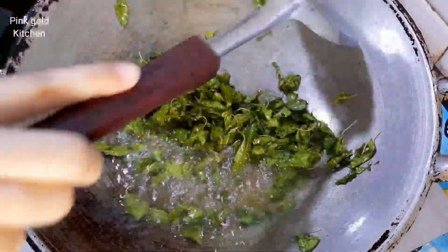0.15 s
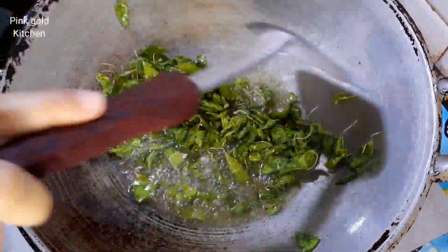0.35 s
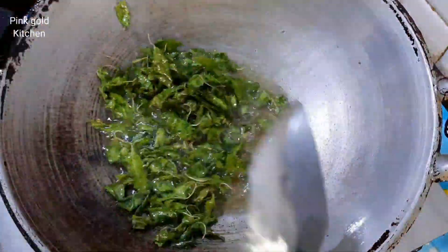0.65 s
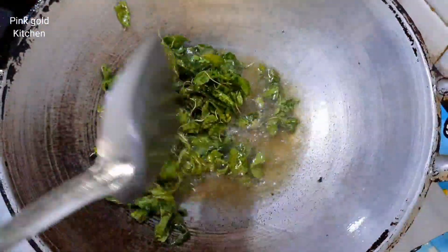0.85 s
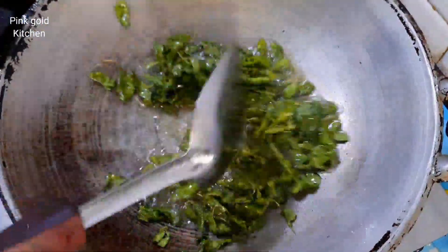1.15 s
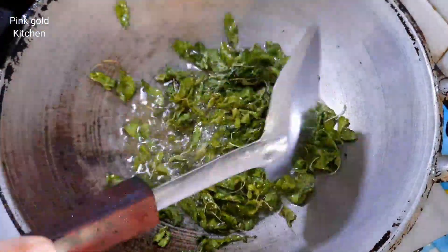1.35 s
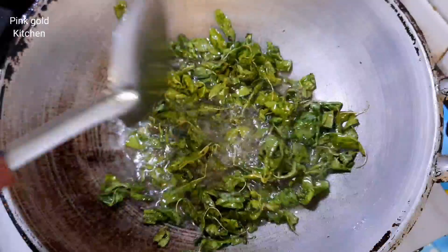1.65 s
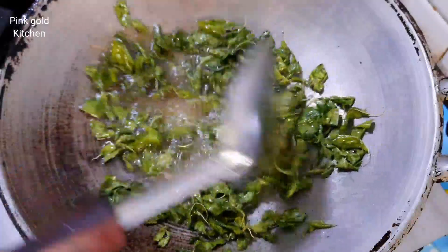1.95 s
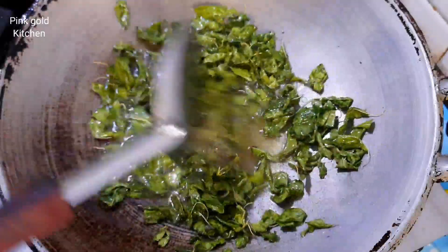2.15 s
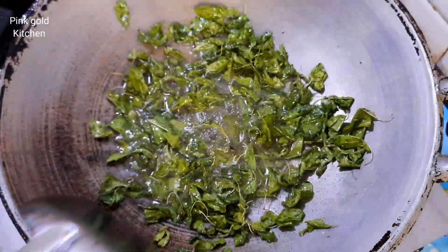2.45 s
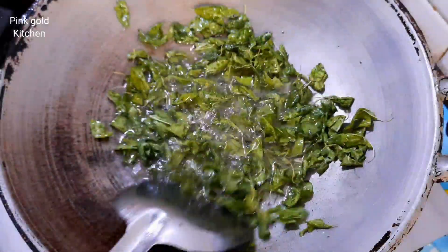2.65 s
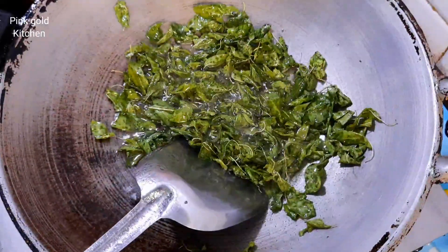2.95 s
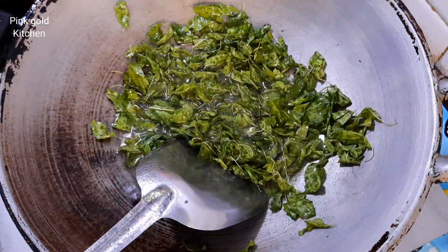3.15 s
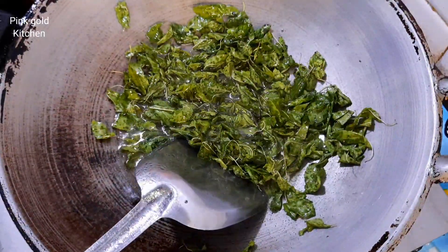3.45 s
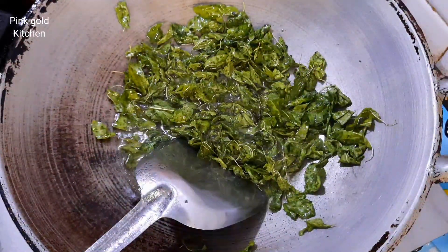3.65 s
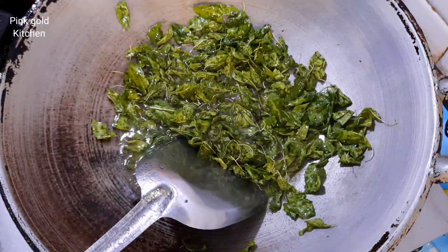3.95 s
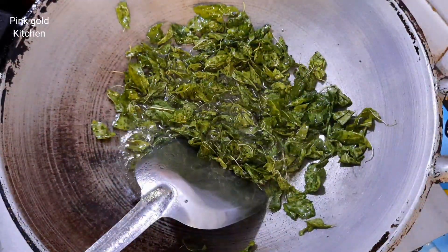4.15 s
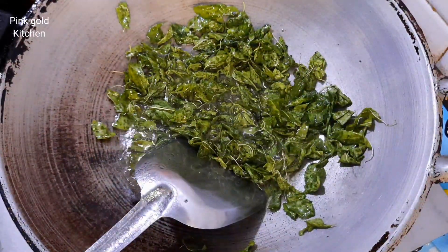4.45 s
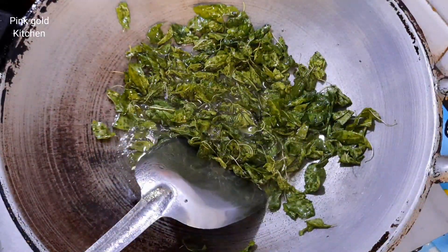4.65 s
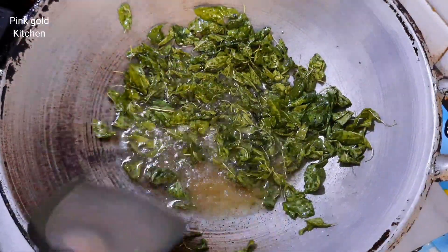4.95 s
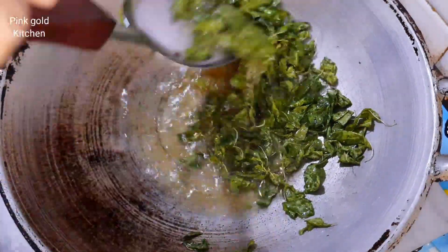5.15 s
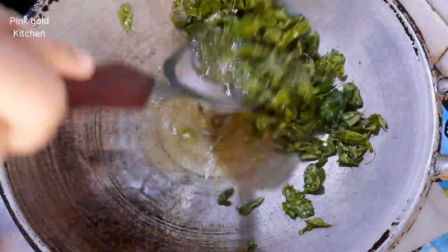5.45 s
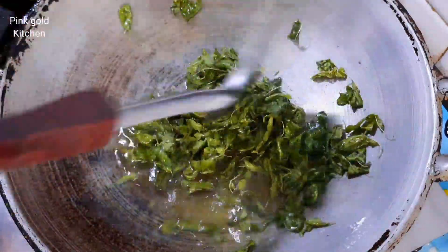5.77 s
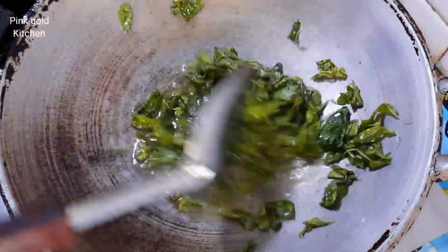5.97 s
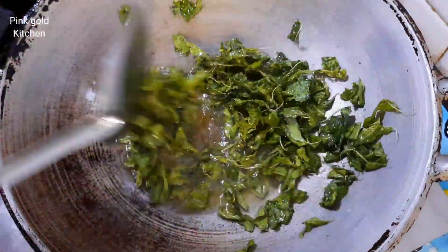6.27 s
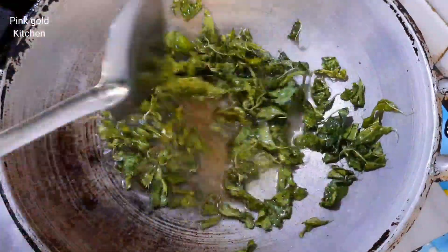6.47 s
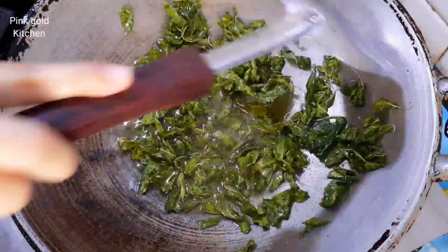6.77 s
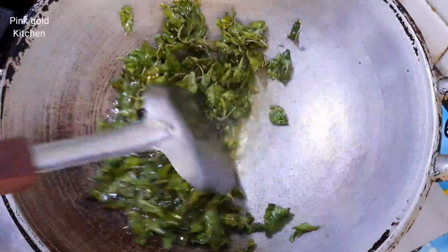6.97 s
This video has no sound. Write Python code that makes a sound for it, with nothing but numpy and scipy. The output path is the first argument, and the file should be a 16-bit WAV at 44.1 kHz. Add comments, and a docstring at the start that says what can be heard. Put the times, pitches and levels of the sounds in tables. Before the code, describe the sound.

Leaves fry in hot oil with a dense bright sizzle, bubbling plops and sharp spits, while a metal spatula knocks and scrapes the wok.

```python
"""A small kitchen: close by, leaves fry in a pool of hot oil in a wok over a gas flame.
Steam bubbles plop as short rising rings; swarms of tiny noise bursts sizzle and fizz; droplets spit and leaves tick.
A metal spatula pushes the leaves, which squelch and then fizz; it rests in the middle, then stirs again.
Its knocks ring the wok as decaying modes, its scrapes are rough noise, its squeals and drags fuzzy gliding tones.
The gas flame is a soft roar of low noise; a short room tail follows everything in the wok."""
import sys
import numpy as np
from scipy import signal
from scipy.io import wavfile

SR = 44100
rng = np.random.default_rng(int(sys.argv[2]) if len(sys.argv) > 2 else 0)


def generate_wav(sig):
    """Save sig (samples, or channels by samples) to the path in sys.argv[1] as 16-bit PCM at SR."""
    pcm = np.round(np.clip(np.atleast_2d(sig).T, -1, 1) * 32767).astype(np.int16)
    wavfile.write(sys.argv[1], SR, pcm)


N = 313551
TIME = np.arange(N) / SR

# the loudest spitting droplets:
# (time [s], level [dB], pitch [Hz], left over right [dB])
LOUD_SPITS = [(0.679, -15, 11300, 1.0), (0.8076, -11, 5340, 2.5), (0.9124, -13, 14000, -4),
              (1.12, -12.5, 14000, 7), (2.0323, -17, 4640, 2.5), (2.16, -15, 5900, -2),
              (2.3509, -11, 7300, 0), (2.778, -18.5, 10500, 8), (3.0897, -11, 10200, 0),
              (3.112, -8, 6500, 4), (3.3346, -15, 6780, 1), (3.635, -14, 6700, 10),
              (3.6581, -13.5, 9800, 4.0), (3.822, -10.5, 8300, 1), (4.0158, -10, 11100, 3),
              (4.3127, -15.5, 8050, 5), (4.8707, -13, 14300, -2), (5.1208, -16, 13500, -3),
              (5.2183, -15, 7100, 7), (5.8526, -19, 7090, 2), (5.917, -13, 8900, 0), (6.126, -17, 5840, -3),
              (6.195, -17, 7610, 2.5), (7.031, -12, 5380, 0.5)]
# the spatula knocks the wok and rebounds:
# (time [s], level [dB], ring time [factor], brightness [dB per octave], rebound against the knock [dB])
SPATULA_KNOCKS = [(.261, -25.5, 0.64, 8, -8), (0.488, -24.5, 0.85, 13, -15), (.796, -28.5, 1.4, 0, -10),
                  (1.774, -22.5, 0.51, 0, -20), (2.114, -33, 1.3, -1, -39), (2.513, -25, 1.3, -4, -12),
                  (2.822, -24, 1, 0, -12), (4.815, -22.5, 0.55, -15, -44), (4.998, -26, 1, -5, -13),
                  (5.073, -27, 0.85, -12, -24), (5.376, -30, .9, -8, -14), (6.03, -22, .7, 0, -9),
                  (6.355, -30, 0.47, 8, -14), (6.904, -23.5, 1.2, -4, -18), (6.956, -27.5, 1.4, 10, -8)]
# the spatula pushes the leaves; they squelch, then fizz on fresh hot metal:
# (time [s], squelch level [dB], fizz level [dB])
LEAF_PUSHES = [(.2, -34.5, -33), (.54, -36, -32), (1.05, -37.5, -28.5), (1.52, -41, -30), (1.78, -48, -30),
               (2.08, -62, -30.5), (2.46, -53, -29.5), (2.76, -38, -34.5), (5.02, -41.5, -37),
               (5.46, -69, -30), (5.76, -76, -30), (6.1, -55, -33), (6.55, -64, -30), (6.93, -64, -33)]


def bubbling(level_db, pitch_hz, per_s=620, spread_db=5.0, top_db=10.5, pitch_spread=0.35, cycles=1.25, count=10000):
    """Small steam bubbles burst all over the pool: short rings scattered about one pitch."""
    out = np.zeros((2, N))
    starts = rng.integers(0, N, count)
    live = rng.random(count) < per_s * TIME[-1] / count
    sizes = amp(np.minimum(spread_db * rng.exponential(1, count), top_db))
    traits = rng.standard_normal((count, 4))
    live &= traits[:, 0] > -2  # the shallow oil holds no very large, low bubbles
    for at, gain, (tone, ring, place, side) in zip(starts[live], sizes[live], traits[live]):
        hz = pitch_hz[at] * np.exp(pitch_spread * tone)
        bubble = ping(hz, cycles * np.exp(0.5 * ring), glide=0.055, lag=.00008 + .00007 * place)
        add(out, at / SR, gain * panned(3 * side) * bubble)
    return amp(level_db) * evened(out)


def plops(boil_db, pitch_hz):
    """Large bubbles break through the leaves: the skin snaps while the gas pocket rings briefly."""
    # the steam bubbles that stand out:
    # (time [s], level before a 2 dB cut [dB], pitch [Hz], left over right [dB], ring length [cycles])
    large_bubbles = [(0.0235, -13, 1550, -5, 3.9), (0.028, -12, 2190, -3, 3.5), (0.0388, -19, 1214, 1, 10),
                     (0.0443, -15, 1420, -5, 4.8), (0.0582, -13, 1990, 3, 4.1), (0.064, -13.5, 1320, 0, 3),
                     (0.0915, -15, 1470, -1, 2.8), (0.1165, -17, 1690, 0, 4), (0.1214, -14.5, 1800, 2, 2.7),
                     (0.2204, -13, 1900, 1, 2), (0.2503, -13, 1520, -3, 2.5), (0.3017, -19, 1330, 1, 6.3),
                     (0.3345, -20, 1560, -4, 4.6), (0.3725, -17, 1570, 1, 1.9), (0.3834, -14, 1520, 4, 1.7),
                     (0.3886, -17.5, 1200, 0, 2.3), (0.4897, -14, 1220, -2, 4.4),
                     (0.5373, -19, 1260, -1, 3.6), (0.7463, -14.5, 2000, -5, 3.7),
                     (0.7668, -13, 1680, -2, 1.5), (0.8136, -21.5, 1730, 4, 1.3),
                     (0.8425, -17, 1410, -4, 1.3), (0.9193, -17, 1950, -2, 3.3),
                     (0.9862, -15, 2800, -12, 1.6), (0.9957, -16, 1670, -3, 1.6),
                     (1.0187, -12.5, 1930, -1, 4.9), (1.037, -18, 1990, 4, 5.5),
                     (1.0563, -11, 1340, 4, 1.4), (1.0924, -16, 1820, 1, 1.8), (1.1392, -15.5, 1490, 2, 3),
                     (1.208, -18, 1250, 2, 2), (1.2546, -15, 2440, 4, 4.9), (1.2988, -17, 1380, 1, 2.9),
                     (1.4465, -19, 1160, 0, 1.9), (1.5192, -19.0, 1000, 0, 1.8),
                     (1.5305, -14.5, 1460, -7, 1.8), (1.5429, -19, 1740, -2, 1.8),
                     (1.5851, -16, 1700, -1, 3.1), (1.6913, -21, 1340, 1, 1.6),
                     (1.7397, -16, 1420, -1, 1.8), (1.7891, -13, 1860, -2, 3.2),
                     (1.9633, -19.5, 1150, 1, 2.3), (2.2575, -14.5, 1440, -3, 3.1),
                     (2.2946, -20, 1840, -1, 2.2), (2.3542, -16, 1470, -6, 1.8),
                     (2.3727, -17, 1930, 1, 2.1), (2.4044, -17.5, 1200, 2, 1.2),
                     (2.4567, -18.5, 1200, 6, 3.8), (2.493, -16.5, 1225, 3, 4.3),
                     (2.5015, -14.5, 2030, 3, 1.5), (2.5485, -19, 1220, 1, 1.4),
                     (2.5671, -20, 1700, 0, 4.2), (2.6506, -16, 1930, -1, 2.5),
                     (2.676, -18.5, 1260, -3, 2.9), (2.6958, -16.5, 1040, 4, 2),
                     (2.9181, -20.0, 2250, 6, 3.3), (3.0485, -9, 1920, 2, 2), (3.0779, -18, 2200, 2, 1.7),
                     (3.0992, -18, 2280, 9, 1.8), (3.1695, -19, 980, 5, 2.5), (3.1913, -14.5, 1290, 4, 3.1),
                     (3.2146, -18, 1420, 5, 3), (3.2335, -10.0, 1670, 1, 6.1), (3.2916, -17, 1940, 7, 1.5),
                     (3.3223, -13.5, 1690, 5, 1.8), (3.3464, -13.0, 2210, 2, 1.8),
                     (3.3606, -11, 1500, 5, 3.9), (3.398, -16, 1000, 3, 2), (3.3988, -13, 2490, -4, 6.1),
                     (3.4097, -14.5, 1780, 0, 6.4), (3.4598, -20, 1740, 2, 1.8),
                     (3.4732, -12.0, 1370, 2, 2), (3.4809, -15, 1720, 3, 2.2), (3.4967, -8.5, 2600, 3, 1.7),
                     (3.6178, -12.5, 1800, 8, 1.6), (3.6238, -13, 2210, 13, 2.9),
                     (3.7223, -13, 1570, 3, 5.1), (3.7612, -12.5, 1560, 2, 4.4),
                     (3.7973, -12, 1750, 4, 1.4), (3.828, -16, 1860, 6, 2.1), (3.9411, -7, 2250, 3, 1.5),
                     (3.9836, -18, 1800, 1, 3.3), (4.0151, -16, 1680, 1, 3.8),
                     (4.0345, -11.5, 1580, 1, 3.5), (4.0795, -14, 2040, 10, 2.2), (4.13, -16, 1100, 6, 2.4),
                     (4.1691, -14.5, 1750, 7, 2.3), (4.1795, -17.5, 1800, 12, 3.4),
                     (4.2503, -16, 1870, 10, 2.2), (4.279, -11, 1690, 2, 2.8), (4.3574, -18, 1800, 4, 2.5),
                     (4.3881, -16.5, 1970, 2, 1.8), (4.4264, -20, 1540, 2, 5.5),
                     (4.4772, -15.5, 2290, 5, 1.9), (4.5759, -17, 2330, 0, 6.4),
                     (4.5879, -17, 1730, 7, 2.5), (4.5994, -17, 1380, 5, 1.2),
                     (4.6333, -14.0, 1670, 1, 3.4), (4.6683, -11.5, 1310, 1, 2.4),
                     (4.7457, -14, 1680, 3, 2), (4.765, -10, 1630, -3, 4.3), (4.7806, -23, 1800, -2, 2.5),
                     (4.8332, -7, 2440, 0, 2), (4.9457, -18, 2200, -1, 3), (5.0428, -20, 1900, 4, 1.7),
                     (5.1623, -19.5, 1500, 5, 1.4), (5.2682, -19, 1310, 3, 1.4),
                     (5.3077, -20, 2710, 1, 1.8), (5.4553, -13, 2150, 2, 2.2), (5.5683, -22, 1560, 9, 2.1),
                     (5.7974, -17.5, 1400, 0, 1.6), (5.8358, -14.5, 2380, -1, 1.6),
                     (5.9397, -10.5, 2440, -4, 3.3), (5.9982, -14.5, 2140, 5, 2.6),
                     (6.1059, -16.5, 1740, 1, 1.4), (6.3118, -19.5, 1470, -2, 1.9),
                     (6.6406, -20, 1380, 1, 1.8), (6.6692, -15.5, 2630, -3, 2.8),
                     (6.6833, -16, 1860, -2, 3.3), (6.7992, -14, 2830, 0, 2),
                     (6.8243, -15.5, 2550, -4, 1.8), (6.8968, -14, 1980, 6, 1),
                     (6.9165, -10, 1920, -8, 4.4), (7.0214, -15.5, 1700, 0, 1.2),
                     (7.0463, -16.5, 2130, -10, 1.8)]
    lesser_cycles = 1.6
    snap_db, snap_cycles = -7.5, 0.96  # level against the ring, and length
    out = np.zeros((2, N))
    # lesser plops come by chance and follow the boil
    lesser = by_chance(24, boil_db + 6.5, .97 * pitch_hz, spread_db=4.0, pitch_spread=0.39, count=300)
    events = list(large_bubbles) + [(*row, lesser_cycles) for row in lesser]
    for s, db, hz, side_db, cycles in events:
        ring = ping(hz, cycles, glide=0.0052, lag=.00008)
        snap = amp(snap_db) * ping(hz, snap_cycles, glide=0, lag=.00008)
        add(out, s, amp(db - 2.0) * panned(side_db) * bowl(ring + snap))
    return out


def sizzle(surging_db, mean_boil_db, fizz_db):
    """Dense tiny bursts with soft sprays; their level follows a share of the boil and of the fizz."""
    # colour of the sizzle: (frequency [Hz], relative level [dB])
    colour = [(100, -24.5), (500, -17), (1000, -8), (2000, 4), (2800, 2), (3800, 2.5), (5000, -1),
              (6500, -4.5), (7800, -4.5), (9000, -12.5), (16000, -12)]
    base_db, boil_share, flare_share = -31, 0.43, 0.12
    level_db = base_db + boil_share * (surging_db - mean_boil_db)
    level_db = level_db + flare_share * (fizz_db - fizz_db.mean())
    bursts = crackle(per_s=4500, spread_db=3.5, top_db=16.5, burst_s=0.00067, clump_db=2.0, clump_per_s=150,
                     spray_db=-18.5, spray_s=0.012)
    return amp(level_db) * coloured(bursts, colour)


def fizz(fizz_db):
    """Sharper, brighter bursts on the leaves, whose level sputters."""
    # colour of the fizz: (frequency [Hz], relative level [dB])
    colour = [(500, -56), (3000, -24), (5000, -1), (7800, -1.5), (9200, -7), (10500, -5), (12000, -2.5),
              (14000, 1.5), (15700, -2.5)]
    sputter_db, sputters_per_s = 2, 30
    bursts = crackle(per_s=1700, spread_db=5.5, top_db=23, burst_s=0.00017, clump_db=1.5, clump_per_s=100,
                     spray_db=-15, spray_s=0.0087)
    return amp(fizz_db - 1.0 + sputter_db * wander(sputters_per_s)) * coloured(bursts, colour)


def beads(fizz_db):
    """The finest beads of steam tick within the fizz as tiny, very high rings."""
    bead_hz = 10360
    return bubbling(fizz_db - 7.5, np.full(N, bead_hz), per_s=450, spread_db=5.5, top_db=14,
                    pitch_spread=0.313, cycles=3.3, count=4000)


def flares():
    """Level of the fizz in dB: it flares after pushes and loud droplets, fades as wet metal dries, and has lulls."""
    # the fizz drops away for a moment: (time [s], half length [s])
    dips = [(1.992, 0.04), (3.077, 0.022), (3.15, .035), (5.996, 0.019), (6.53, 0.097)]
    rest_db, lull_db = -37.5, -6
    lag_s, rise_s, fade_s = 0.12, 0.26, 0.17
    spatter_db, spatter_s = -40, 0.023  # trail after a loud droplet: against the droplet's level, and its fade
    power = amp(rest_db) ** 2
    for s, _, db in LEAF_PUSHES:
        age = TIME - s - lag_s
        flare = np.exp(np.minimum(age / rise_s, -age / fade_s))
        power = power + (amp(db) * flare) ** 2
    for s, db, *_ in LOUD_SPITS:
        trail = (TIME > s) * np.exp(-abs(TIME - s) / spatter_s)
        power = power + (amp(db + spatter_db) * trail) ** 2
    lull = sum(np.exp(-((TIME - s) / half_s) ** 2) for s, half_s in dips)
    return 10 * np.log10(power) + lull_db * lull


def spits(spray_db=1.0, spray_s=0.00096, spray_above_hz=4500, size=700):
    """Water droplets explode in the oil: a sharp ring and a short, bright spray."""
    out, t = np.zeros((2, N)), np.arange(size) / SR
    lesser = by_chance(2.8, -17, 7850, spread_db=8.0, pitch_spread=0.73)
    high_pass = signal.butter(2, spray_above_hz, "high", fs=SR)
    for s, db, hz, side_db in [*LOUD_SPITS, *lesser]:
        hiss = signal.lfilter(*high_pass, rng.standard_normal((2, size)))
        spray = amp(spray_db) * hiss * np.exp(-t / spray_s)
        snap = bowl(ping(hz, 2.9, glide=0, lag=0.0001, size=size) + spray)
        add(out, s + .001, amp(db) * panned(side_db) * snap)  # a millisecond after its listed time
    return out


def slosh(boil_db):
    """Soft, wet collapses of air pockets under the leaves; pushes add swells to those the boil moves."""
    # colour of the squelch: (frequency [Hz], relative level [dB])
    colour = [(150, -23), (400, -17.5), (700, 1.5), (950, 5), (1400, -2), (3000, -38), (8000, -58)]
    push_s, under_boil_db = 0.12, -21.5  # half the length of a push; squelch of leaves that only the boil moves
    squishes = crackle(per_s=500, spread_db=3.0, top_db=25.0, burst_s=0.00084, clump_db=2.5, clump_per_s=60)
    power = amp(boil_db + under_boil_db) ** 2
    for s, db, _ in LEAF_PUSHES:
        power = power + amp(db) ** 2 * np.exp(-((TIME - s) / push_s) ** 2)
    return np.sqrt(power) * coloured(squishes + .5 * squishes[::-1], colour)  # [::-1] swaps the sides


def ticks(size=64):
    """Leaves crack as they crisp: dry, single clicks with no pitch."""
    # colour of a tick: (frequency [Hz], gain [dB])
    colour = [(300, -24), (1200, -8), (3000, -3), (7000, -3), (16000, -1)]
    out = np.zeros((2, N))
    click = signal.unit_impulse(size) * np.ones((2, 1))
    for s, db, _, side_db in by_chance(36, -22, 1, spread_db=6, pitch_spread=0, side_spread_db=6, count=600):
        add(out, s, amp(db) * panned(side_db) * click)
    return filtered(out, colour)


def puff():
    """A drop of water bursts under the leaves: one dull swing of pressure, with no ring."""
    start_s, peak_db, swing_s = 4.3148, -23.5, 0.00085
    age = np.maximum(TIME - start_s, 0) / swing_s
    swing = age * (2 - age) * np.exp(-age)
    return amp(peak_db) * swing / swing.max()


def knocks(size=12000):
    """The blade bumps the wok and rebounds softly; a resting blade damps the ring, a hard edge favours high modes."""
    # modes of the wok, damped by oil and leaves:
    # (frequency [Hz], level [dB], t60 before the knock's ring factor [s])
    modes = [(184, -14, 0.1), (289, 4, 0.065), (323.3, 0.5, 0.18), (378, -0.5, 0.14), (444.5, 0.5, 0.098),
             (512, -3, 0.04), (745, -4.5, 0.04), (960, -45, 0.11)]
    contact_s, rebound_s, rebound_contact_s = 0.0021, .039, 0.0085
    out, t = np.zeros((2, N)), np.arange(size) / SR
    hz, mode_db, t60 = np.transpose(modes)[:, :, None]
    for s, db, free, bright_db, rebound_db in SPATULA_KNOCKS:
        tilt_db = bright_db * np.log2(hz / hz[0])
        level_db = mode_db + tilt_db - 60 * t / (t60 * max(free, .2))
        blows = [(0, db, contact_s), (rebound_s, db + rebound_db, rebound_contact_s)]
        for delay, blow_db, onset_s in blows:
            detune = 1 + 0.05 * rng.standard_normal(hz.shape)  # the load of oil shifts
            phase = rng.uniform(0, 2 * np.pi, hz.shape)
            partials = amp(level_db) * np.sin(2 * np.pi * hz * detune * t + phase)
            ring = partials.sum(0) * (1 - np.exp(-t / onset_s))
            add(out, s + delay, amp(blow_db) * ring / abs(ring).max())
    return amp(-1.5) * out


def grating():
    """The blade grates for an instant as it lands: brief rough noise under each knock."""
    # colour of the grating: (frequency [Hz], relative level [dB])
    colour = [(100, -7), (250, -3), (480, -5), (800, -2), (2000, -12), (8000, -14)]
    under_knock_db, fade_s = -17, 0.013
    level = sum(amp(db) * (TIME >= s) * np.exp(-abs(TIME - s) / fade_s) for s, db, *_ in SPATULA_KNOCKS)
    noise = rng.standard_normal(N) + .3 * rng.standard_normal((2, N))
    return amp(under_knock_db) * level * coloured(noise, colour)


def thumps(size=5000):
    """Knocks rock the wok on its stand: a low decaying tone whose dB level grows twice as fast as the knock's."""
    thump_hz, thump_db, fade_s = 132, -27.5, 0.014
    hard_knock_db = -19.5  # a knock of this level would thump at thump_db
    out, t = np.zeros((2, N)), np.arange(size) / SR
    tone = np.sin(2 * np.pi * thump_hz * t) * np.exp(-t / fade_s)
    for s, db, *_ in SPATULA_KNOCKS:
        add(out, s, amp(thump_db + 2 * (db - hard_knock_db)) * tone)
    return out


def scrapes():
    """Short strokes of steel on oily metal: fast slips that hiss and grind."""
    # the blade scrapes the metal:
    # (time [s], length [s], hiss level [dB], grinding body against the hiss [dB])
    strokes = [(1.775, 0.035, -27.5, 0), (1.925, 0.027, -25, -13), (4.994, 0.016, -16.5, -18),
               (5.066, 0.011, -20, -6.5), (5.372, 0.017, -24, -14), (6.031, 0.014, -38.5, 5),
               (6.895, 0.06, -41, 8.5), (6.96, 0.06, -28, -3)]
    # colour of the hiss: (frequency [Hz], relative level [dB])
    hiss_colour = [(300, -7), (1500, -6), (3800, 8), (6000, 6), (8000, 5), (10000, 1), (16000, 3)]
    # colour of the grinding body: (frequency [Hz], relative level [dB])
    body_colour = [(100, -25), (350, -19), (600, -4), (1000, 11), (1900, 3), (3000, 8), (8000, -27)]
    out = np.zeros((2, N))
    slips = crackle(per_s=1200, spread_db=5.5, top_db=6, burst_s=0.00019, clump_db=2.0, clump_per_s=350)
    hiss = coloured(slips, hiss_colour)
    body = coloured(slips + 1.9 * slips[::-1], body_colour)
    for s, length, db, body_db in strokes:
        stroke = np.sqrt(np.maximum(1 - (2 * (TIME - s) / length - 1) ** 2, 0))
        out += amp(db) * stroke * (hiss + amp(body_db) * body)
    return out


def squeals():
    """The blade squeals faintly as it slides: high stick-slip tones."""
    # (time [s], length [s], level [dB], first pitch [Hz], last pitch [Hz])
    strokes = [(5.314, 0.045, -32.5, 2850, 3340), (5.405, 0.035, -35, 2350, 2050),
               (5.455, 0.05, -30.5, 2120, 1900), (5.54, 0.16, -37, 3154, 2660),
               (6.343, 0.028, -34, 2600, 2800), (6.462, 0.049, -33, 1983, 1903),
               (6.968, 0.02, -31, 3100, 3700)]
    return rubbing(strokes, width_hz=160, apart=2.7, rough_db=3.5)


def drags():
    """The blade drags along the wok, which drones under it: low stick-slip tones."""
    # (time [s], length [s], level [dB], first pitch [Hz], last pitch [Hz])
    strokes = [(.29, 0.063, -37, 394, 484), (.5, .09, -41, 478, 433), (.81, .07, -41, 374, 400),
               (2.53, 0.076, -42.5, 359, 320), (5.0, 0.11, -43, 441, 340), (6.9, 0.14, -43, 403, 429)]
    return rubbing(strokes, width_hz=99, apart=0.27, rough_db=0.5)


def rubbing(strokes, width_hz, apart, rough_db, slips_per_s=500):
    """Stick and slip: a fuzzy, uneven tone that glides with each stroke; apart sets how much the sides differ."""
    out = np.zeros((2, N))
    r = np.exp(-np.pi * width_hz / SR)
    noise = rng.standard_normal((2, 1, N)) + apart * rng.standard_normal((2, 2, N))
    slow_noise = signal.lfilter([1 - r], [1, -r], noise)
    fuzz = evened(slow_noise * amp(rough_db * wander(slips_per_s)))
    for s, length, db, first_hz, last_hz in strokes:
        span = slice(round(s * SR), round((s + length) * SR))
        hz = np.linspace(first_hz, last_hz, len(TIME[span]))
        turn = 2 * np.pi * np.cumsum(hz) / SR
        tone = fuzz[0, :, span] * np.cos(turn) + fuzz[1, :, span] * np.sin(turn)
        add(out, s, amp(db) * tone * signal.windows.tukey(len(hz), .5))
    return out


def flame():
    """The gas flame roars softly: low noise, almost alike on both sides."""
    # roar of the burner: (time [s], level before a 1.5 dB lift [dB])
    roar = [(0, -45.5), (5.7, -45), (6.45, -44), (6.77, -39.5), (7.11, -41.5)]
    # colour of the roar: (frequency [Hz], relative level [dB])
    colour = [(15, -19), (30, -7), (50, -7), (78, -0.5), (115, -0.5), (160, -5.5), (220, -14), (320, -8),
              (500, -20), (1000, -22), (4000, -70)]
    noise = rng.standard_normal(N) + 0.067 * rng.standard_normal((2, N))
    return amp(follow(roar)[0] + 1.5) * coloured(noise, colour)


def kitchen(x, room_db=-11, size=16000):
    """The short tail of a tiled room: sparse random echoes that fade at a rate set by frequency."""
    # reverberation: (frequency [Hz], t60 [s])
    decay = [(200, 0.16), (1500, 0.16), (6000, 0.11), (15000, 0.14)]
    taps = rng.standard_normal((2, size)) * (rng.random((2, size)) < .1) * (TIME[:size] > .005)
    hz, t, z = signal.stft(taps, SR, nperseg=256)
    fade = amp(-60 * t / read(decay, hz)[:, None])
    tail = signal.istft(z * fade, SR, nperseg=256)[1][:, :size]
    return x + convolve(x, amp(room_db) * tail / np.linalg.norm(tail[0]))


def bowl(x, count=8, size=260):
    """The steep sides of the wok throw back a few quick echoes, drawn anew for every sound."""
    echoes = np.zeros((2, size))
    places = rng.integers(size // 8, size, (2, count))
    np.put_along_axis(echoes, places, rng.choice([-1, 1], (2, count)), 1)
    echo_db = -10
    return x + amp(echo_db) * convolve(x, echoes / np.sqrt(count))


def crackle(per_s, spread_db, top_db, burst_s, clump_db, clump_per_s, spray_db=-17, spray_s=0.0031, size=800):
    """A swarm of noise bursts of widely varied size that swells in clumps; each is a sharp snap and a short spray."""
    t = np.arange(size) / SR
    live = rng.random(N) < per_s / SR
    db = np.minimum(spread_db * rng.exponential(1, N), top_db) + clump_db * wander(clump_per_s)
    side_db = rng.normal(0, 1.9, N)
    fade = np.exp(-t / burst_s) + amp(spray_db) * np.exp(-t / spray_s)
    hits = live * amp([db + side_db, db - side_db])
    power = convolve(hits ** 2, fade ** 2)  # unrelated bursts add in power
    return np.sqrt(abs(power)) * rng.standard_normal((2, N))


def ping(hz, cycles, glide, lag, size=900):
    """A gas pocket rings for a few cycles, rising in pitch if glide is set; the right side lags by lag seconds."""
    turns = hz * np.maximum(np.arange(size) / SR - np.array([[0], [lag]]), 0)
    age = turns / max(cycles, .3)
    swell = 2 * age * np.exp(1 - 2 * age)
    return swell * np.sin(2 * np.pi * turns * (1 + glide * np.minimum(age, 4)))


def by_chance(per_s, level_db, pitch_hz, spread_db, pitch_spread, side_spread_db=3, count=120):
    """Events scattered by chance: rows of (time [s], level [dB], pitch [Hz], left over right [dB])."""
    at, luck = rng.integers(0, N, count), rng.permutation(count)
    size, tone, side = rng.uniform(-0.89, 1, (3, count))
    db = np.broadcast_to(level_db, N)[at] + spread_db * size
    hz = np.broadcast_to(pitch_hz, N)[at] * np.exp(pitch_spread * tone)
    rows = np.transpose([at / SR, db, hz, side_spread_db * side])
    return rows[luck < per_s * TIME[-1]]


def wander(per_s):
    """Random level of rms 1, joined by straight lines between so many new values a second."""
    return evened(np.interp(TIME * per_s, np.arange(4000), rng.standard_normal(4000)))


def amp(db):
    """Decibels to gain."""
    return 10 ** (np.asarray(db) / 20)


def evened(x):
    """Scales to rms 1."""
    return x / np.sqrt(np.mean(x ** 2) + 1e-20)


def read(points, hz):
    """Reads a spectrum on a log-frequency axis."""
    f, value = np.transpose(points)
    return np.interp(np.log(hz + 1), np.log(f), value)


def follow(table):
    """The columns of a curve table, sample by sample."""
    s, *columns = np.transpose(table)
    return [np.interp(TIME, s, c) for c in columns]


def panned(db):
    """Left and right gains for a level difference."""
    return amp(np.array([[db], [-db]]) / 2)


def add(mix, s, sound):
    """Mixes a mono or stereo sound in at time s."""
    part = mix[:, max(round(s * SR), 0):][:, :sound.shape[-1]]
    part += sound[..., :part.shape[1]]


def convolve(x, response):
    """Causal convolution, channel by channel."""
    return signal.oaconvolve(x, np.atleast_2d(response), axes=1)[:, :x.shape[1]]


def filtered(x, spectrum, size=4096):
    """Minimum-phase filter, which keeps clicks sharp."""
    log_gain = np.log(amp(read(spectrum, abs(np.fft.fftfreq(size, 1 / SR)))))
    response = np.fft.ifft(np.exp(np.conj(signal.hilbert(log_gain)))).real
    return convolve(x, response[:size // 2])


def coloured(x, spectrum):
    """Gives x a spectrum; rms 1."""
    return evened(filtered(x, spectrum))


def scene():
    """Everything in the wok sounds through the kitchen, over the flame."""
    # how hard the leaves boil: (time [s], level [dB])
    boil = [(0, -25.5), (.17, -29), (.35, -29.5), (.55, -28.5), (.68, -32), (.86, -29), (1.02, -28.5),
            (1.25, -35), (1.8, -31.5), (2.05, -34.5), (2.35, -33.5), (2.55, -30.5), (2.78, -36), (2.9, -29),
            (3.12, -30.5), (3.5, -25), (3.78, -27.5), (3.89, -29), (4.03, -26), (4.38, -34), (4.55, -29),
            (4.78, -27), (5.08, -35.5), (5.46, -31.5), (5.7, -32.5), (6.05, -34.5), (6.3, -39.5),
            (6.65, -32.5), (6.8, -35.5), (6.93, -28), (7.11, -35)]
    # the bubbles shrink as the leaves dry, with dips in pitch on the way: (time [s], pitch [Hz])
    bubble_pitch = [(0, 1740), (2.1, 1736), (2.7, 1560), (3.1, 1780), (5.05, 1880), (5.55, 2280),
                    (7.11, 2080)]
    surge_db, surges_per_s = 2, 40  # steam escapes in uneven surges
    boil_db, pitch_hz, fizz_db = follow(boil)[0], follow(bubble_pitch)[0], flares()
    surging_db = boil_db + surge_db * wander(surges_per_s)
    wok = bubbling(surging_db - 3.3, pitch_hz) + plops(boil_db, pitch_hz)
    wok += sizzle(surging_db, boil_db.mean(), fizz_db) + fizz(fizz_db) + beads(fizz_db)
    wok += spits() + slosh(boil_db) + ticks() + scrapes() + squeals()
    low = knocks() + grating() + thumps() + drags() + puff()
    return kitchen(wok) + kitchen(low, room_db=-23.0) + flame()


def record(dry):
    """Each microphone port has its own colour; the tallest peaks are rounded; then a steep band limit."""
    # how much more the left port hears than the right: (frequency [Hz], difference [dB])
    port_difference = [(60, 0.5), (350, 0), (830, 7), (1300, 2.5), (2800, 1.5), (3900, 3), (5600, 0.5),
                       (6600, 0.5), (7700, 6.5), (8900, 0), (10200, 6.5), (12200, 0), (15000, 1.5)]
    ceiling, cut_hz = .52, 15800
    ports = []
    for side, sign in zip(dry, (1, -1)):
        half_difference = [(hz, sign * db / 2) for hz, db in port_difference]
        ports.append(filtered(side[None], half_difference))
    rounded = ceiling * np.tanh(np.vstack(ports) / ceiling)
    low_pass = signal.firwin(401, cut_hz, window=("kaiser", 9), fs=SR)
    return signal.oaconvolve(rounded, low_pass[None], "same", axes=1)


dry = scene()
out = record(dry)
generate_wav(out)
```